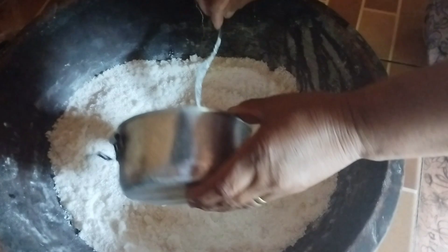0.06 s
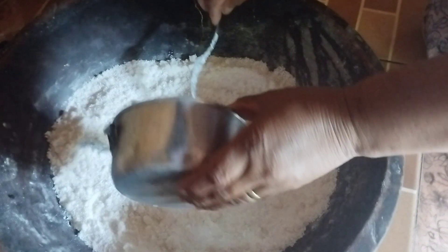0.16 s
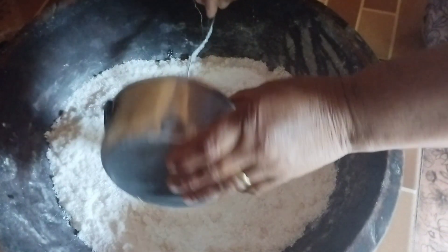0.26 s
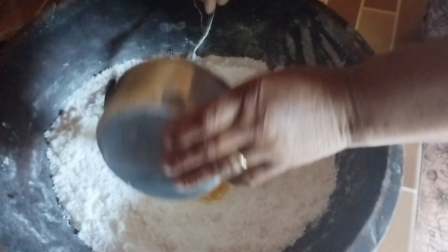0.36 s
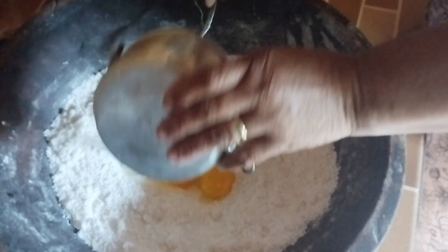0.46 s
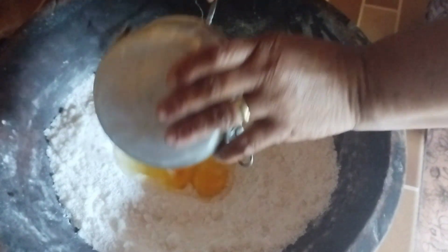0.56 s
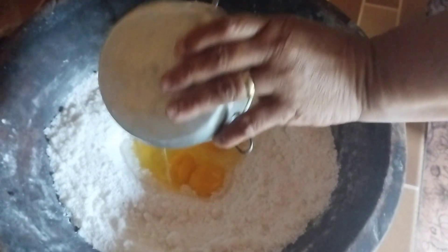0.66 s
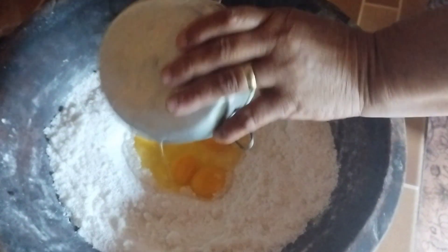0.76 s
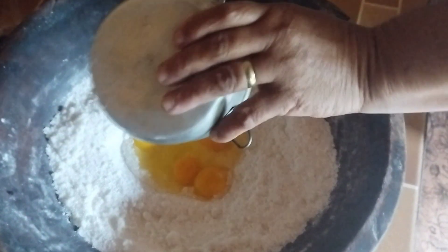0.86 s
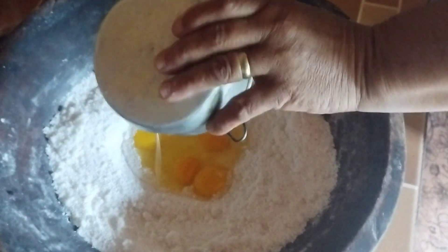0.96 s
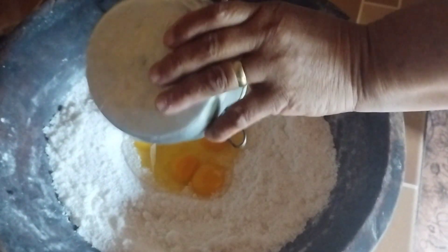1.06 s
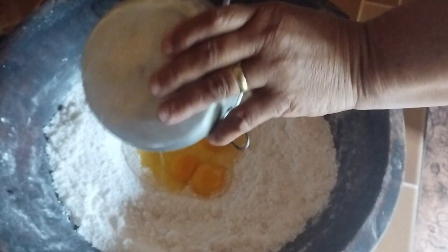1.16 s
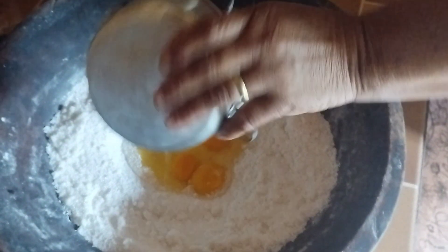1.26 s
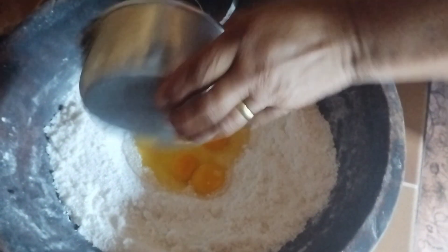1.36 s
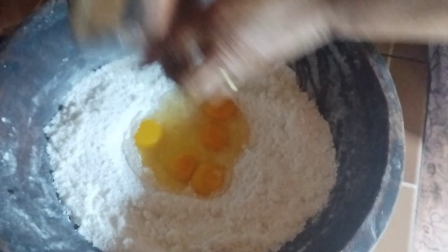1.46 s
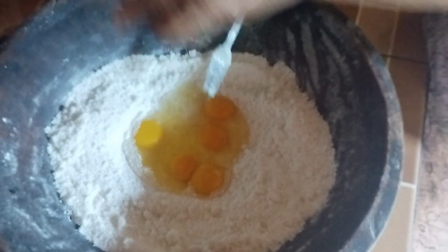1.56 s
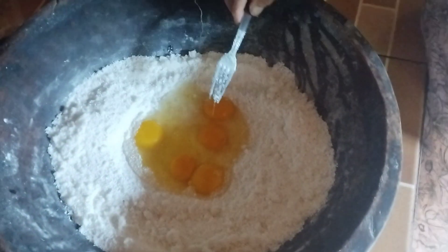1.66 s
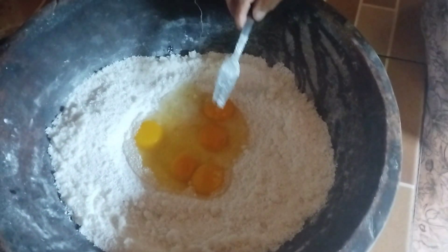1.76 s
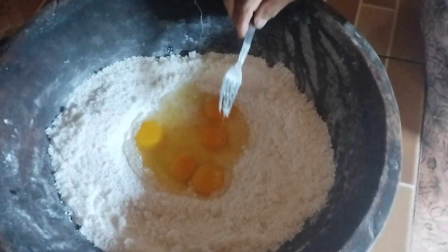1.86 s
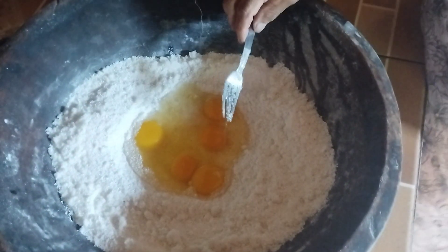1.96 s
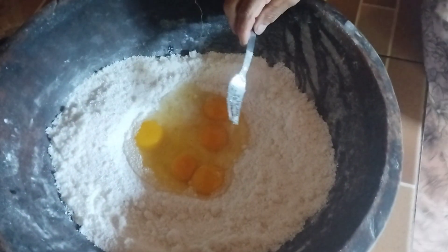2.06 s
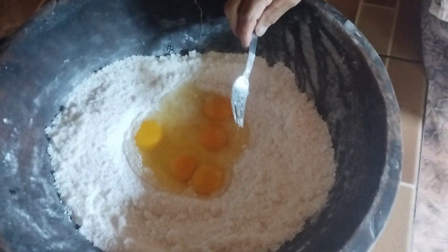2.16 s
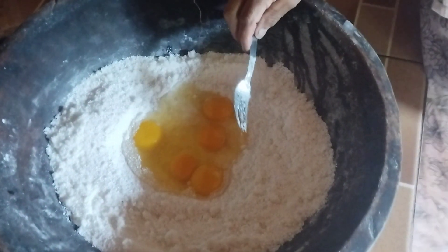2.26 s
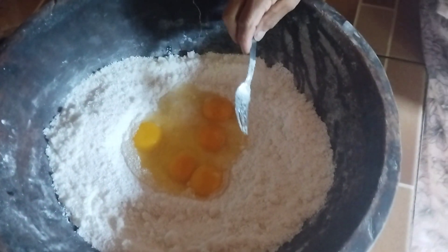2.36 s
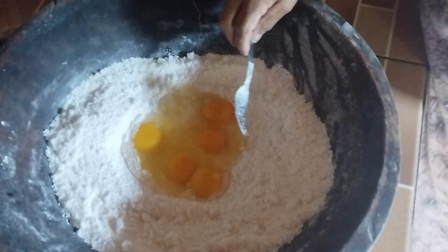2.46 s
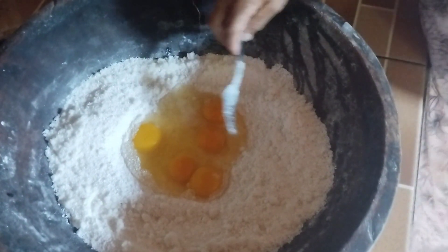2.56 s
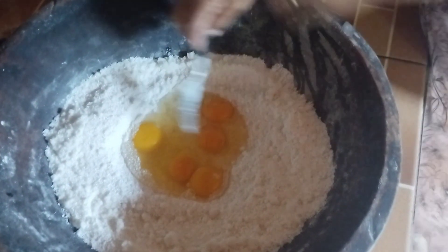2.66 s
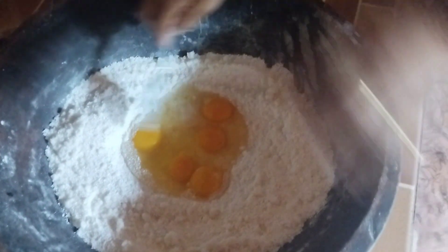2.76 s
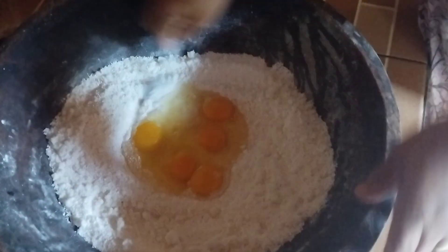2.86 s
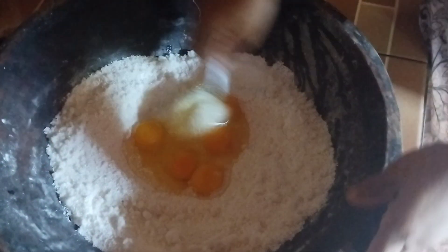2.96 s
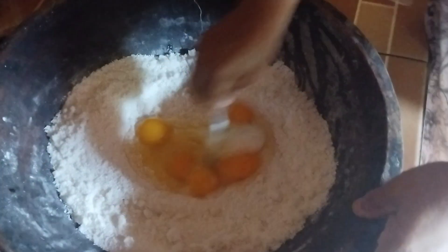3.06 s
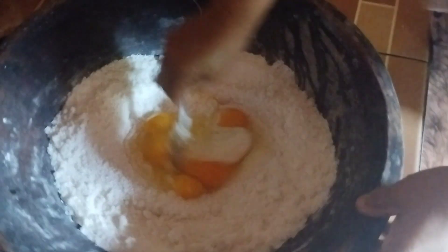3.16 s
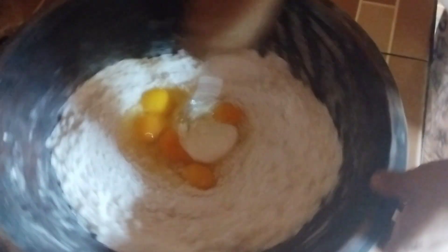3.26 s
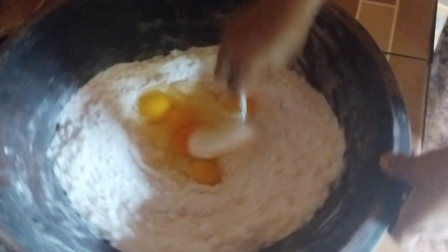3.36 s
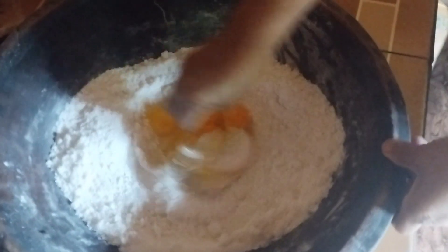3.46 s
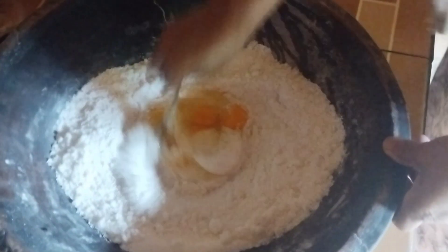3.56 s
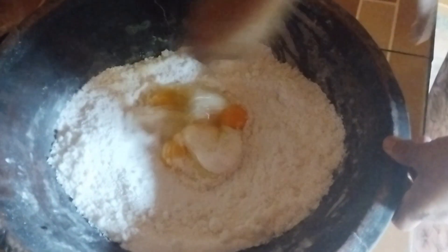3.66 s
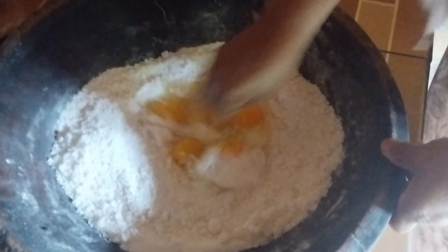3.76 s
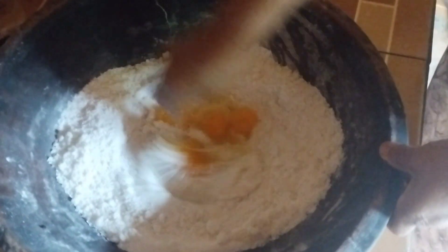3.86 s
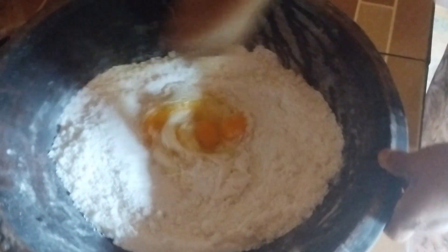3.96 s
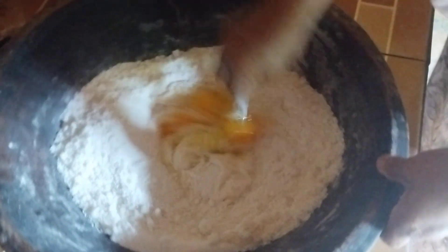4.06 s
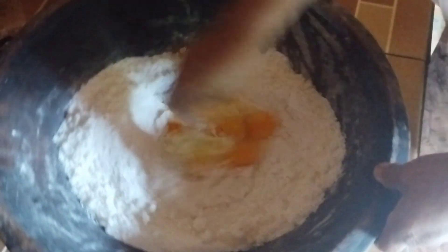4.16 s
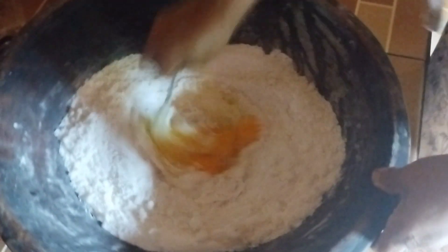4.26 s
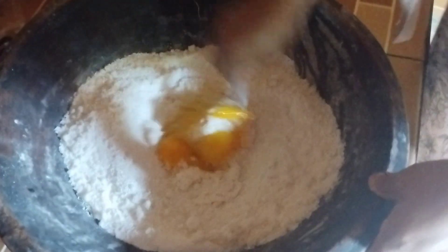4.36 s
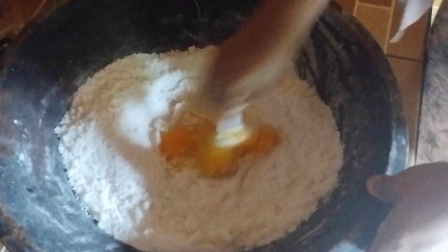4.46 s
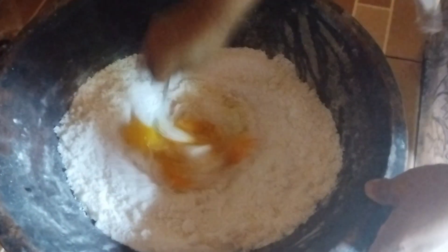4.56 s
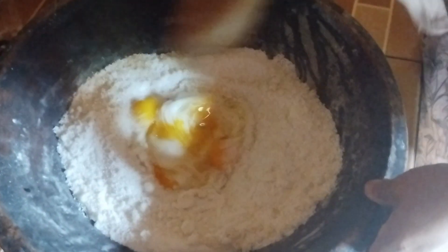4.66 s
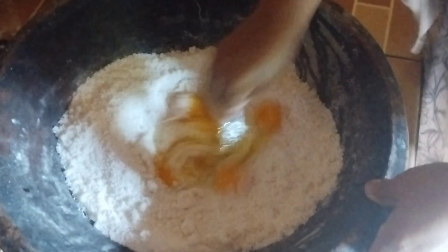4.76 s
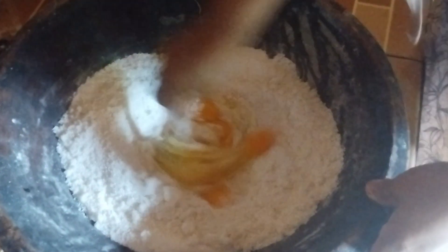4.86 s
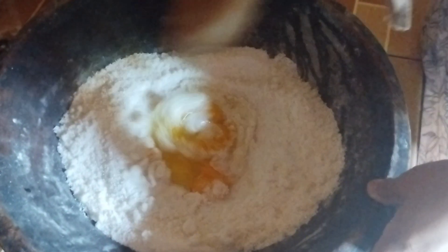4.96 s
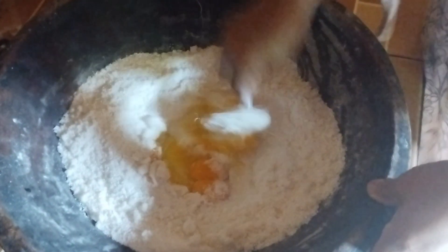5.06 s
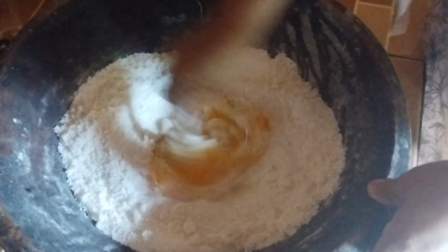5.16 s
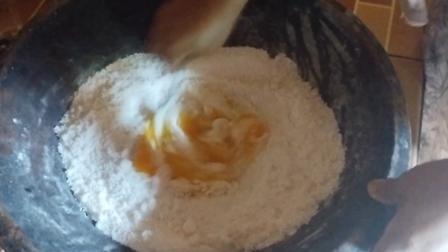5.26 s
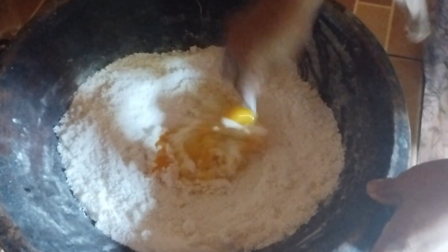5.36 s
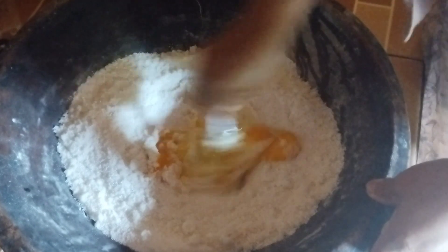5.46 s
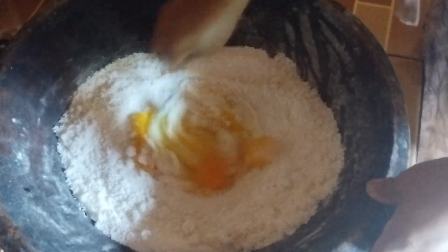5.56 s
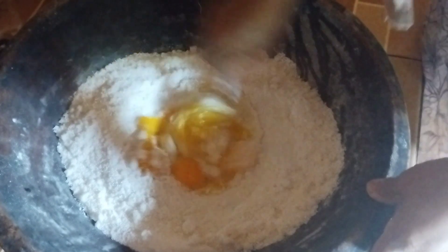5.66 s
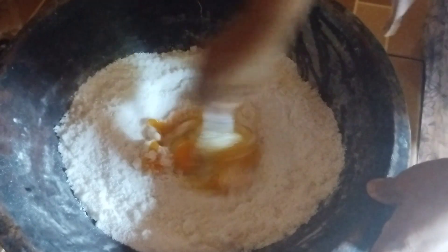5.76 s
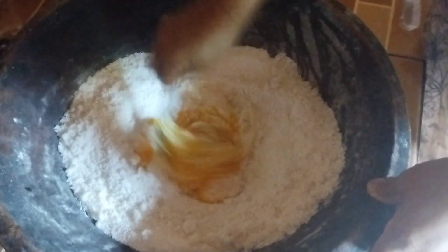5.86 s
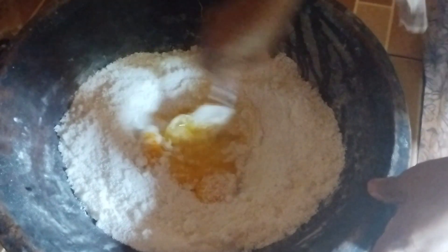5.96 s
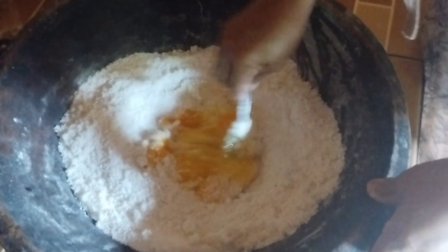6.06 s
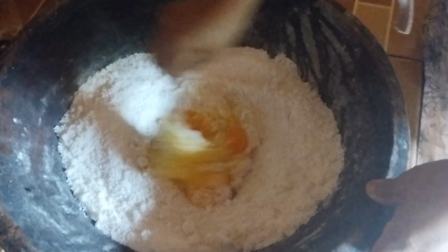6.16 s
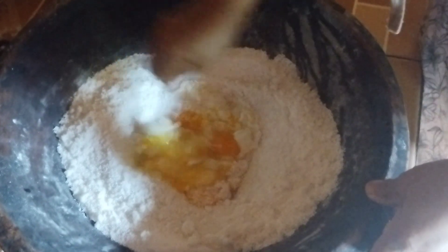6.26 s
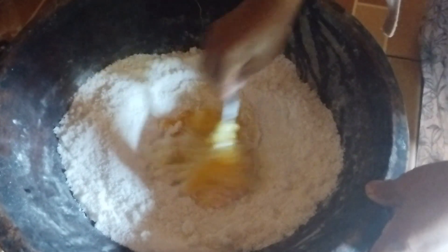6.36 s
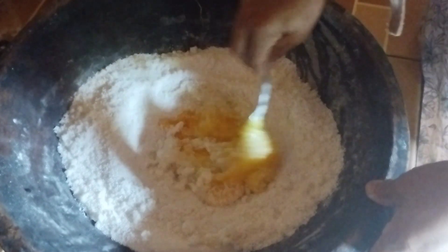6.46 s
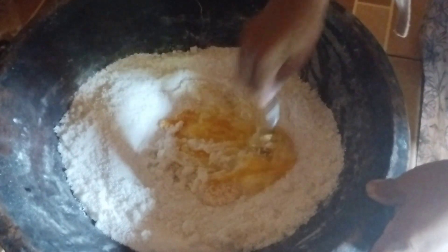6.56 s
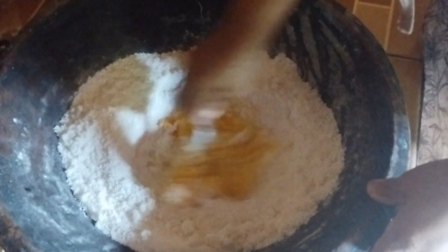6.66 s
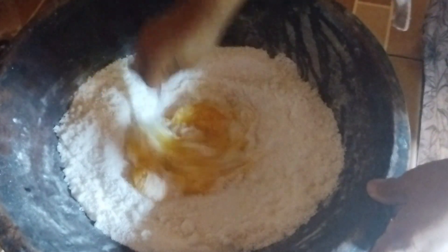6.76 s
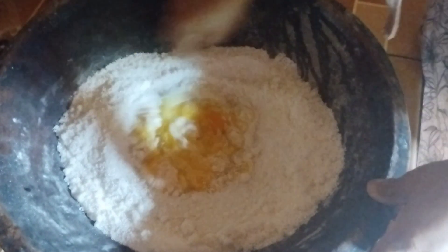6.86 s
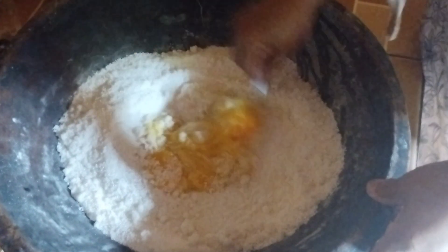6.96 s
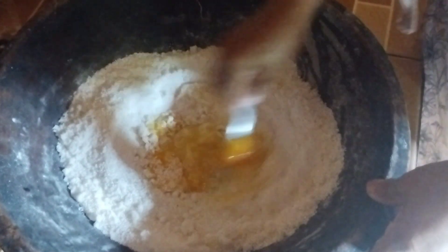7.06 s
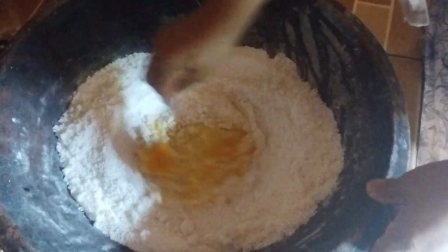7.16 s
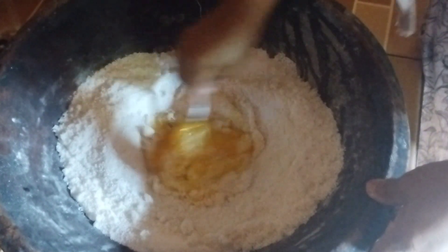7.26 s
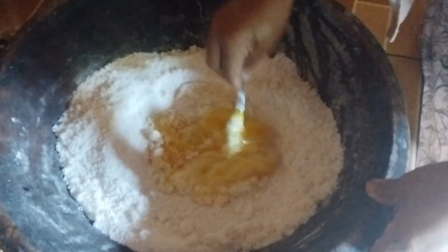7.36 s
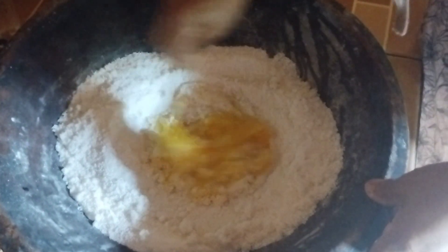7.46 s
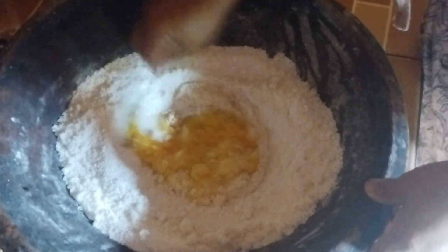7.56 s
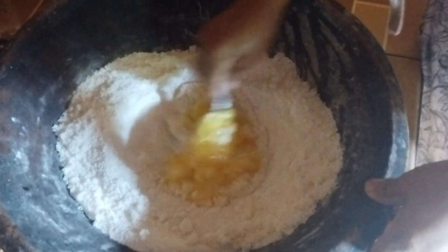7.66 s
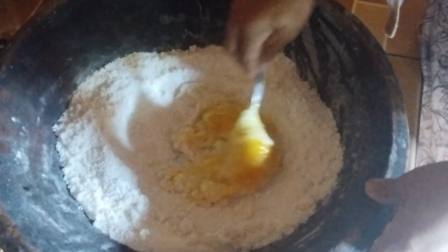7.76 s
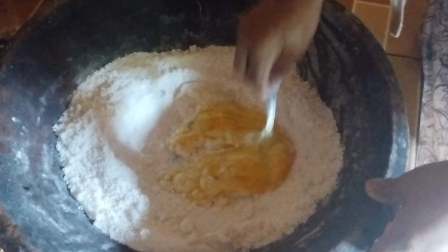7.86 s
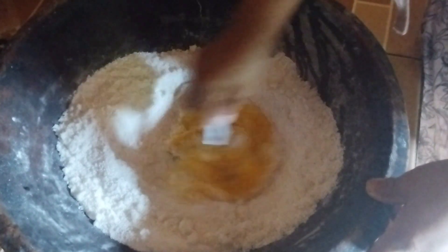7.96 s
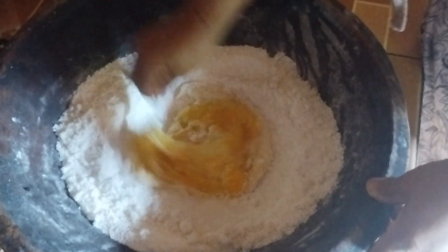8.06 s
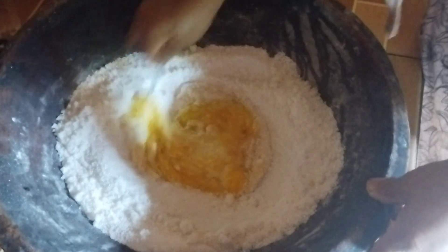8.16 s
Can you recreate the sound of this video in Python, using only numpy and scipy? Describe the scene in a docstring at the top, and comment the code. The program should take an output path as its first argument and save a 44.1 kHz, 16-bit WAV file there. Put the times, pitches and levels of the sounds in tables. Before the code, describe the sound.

A close stereo pickup in a small, reflective tiled kitchen, with faint hiss. From 0 to 1.5 s a hand-damped steel pot makes light ticks and dull hollow knocks; eggs land with a barely audible soft crunch near 0.4. Loose wire handles snap brightly and chatter near 1.0 and 1.4. Small ticks follow around 1.7, then at 2.24 the pot is set down with by far the loudest sound, a bright ringing clank, with further clanks at 2.4 and 2.48 as it rattles flat. The hiss drops nearly away, then returns around 2.9. From 3.0 a fork jabs and drags through gritty starch about three times a second, with dull basin bumps and a sharper jab at 5.1. From 5.7 to 8.2 the strokes become swelling, wetter raspy sweeps, strong at first and varying in force, over soft low thuds and booms.

```python
"""A fork beats eggs about three times a second, tines stick-slipping through starch along a softly booming basin.
First the eggs are tipped in from a small steel pot, heard as dull hollow knocks; its wire handles flop and clink.
The pot is set down on something hard, rings as a sum of dying modes and rocks flat in a run of tiny slips.
Touches are coloured noise bursts; a small tiled kitchen answers with dense reflections.
Background hiss is turned down by the recorder after the loud blow, then let back up."""
import sys
import numpy as np
from scipy import signal
from scipy.fft import rfft, irfft
from scipy.io import wavfile

SR = 44100
rng = np.random.default_rng(int(sys.argv[2]) if len(sys.argv) > 2 else 0)


def digitize_waveform(pressure):
    """Quantize a signal to 16-bit integers and store it at the path in sys.argv[1].

    Rows of a 2-D input are taken as channels; values are limited to [-1, 1].
    """
    field = np.atleast_2d(pressure).T
    bounded = np.clip(field, -1, 1)
    quanta = np.round(bounded * 32767).astype(np.int16)
    wavfile.write(sys.argv[1], SR, quanta)


N = 362061
T = np.arange(SR // 2) / SR  # time since a blow [s]


def amp(db):
    """Decibels to gain."""
    return 10 ** (np.asarray(db) / 20)


def evened(x):
    """Scales to rms 1."""
    return x / np.sqrt(np.mean(x ** 2) + 1e-20)


def read(points, hz):
    """Interpolates a table on a log-frequency axis."""
    table_hz, value = np.transpose(points)
    return np.interp(np.log(hz + 1), np.log(table_hz + 1), value)


def sides(left_right_db):
    """Left and right gains for a level difference, at constant power."""
    return evened(amp([[left_right_db / 2], [-left_right_db / 2]]))


def fade(t60_s):
    """Exponential decay after a blow."""
    return np.exp(-np.log(1000) * T / max(t60_s, 1e-3))


def add(mix, start_s, sound):
    """Mixes a sound in at a start time."""
    part = mix[:, max(round(start_s * SR), 0):][:, :sound.shape[1]]
    part += sound[:, :part.shape[1]]


# left-right likeness of noise: (frequency [Hz], correlation [0-1])
LIKENESS = [(130, .88), (700, .75), (1500, .05)]


def noise(colour, size=len(T), centre_hz=1, focus_db=0):
    """Coloured stereo noise, alike in the bass; focus_db is its fall an octave from centre_hz."""
    hz = np.fft.rfftfreq(size, 1 / SR)
    left, other = rfft(rng.standard_normal((2, size)))
    same = np.clip(read(LIKENESS, hz), -1, 1)
    right = same * left + np.sqrt(1 - same ** 2) * other
    octaves = np.log2((hz + 1) / centre_hz)
    fall_db = focus_db * 2 * octaves ** 2 / (1 + octaves ** 2)
    gain = amp(read(colour, hz) - fall_db)
    return evened(irfft(np.array([left, right]) * gain, size))


def ring(modes, length=1, side=((1, 0),), split=.025, twin_db=-6):
    """Dying modes of alternating sign; high ones have a faint twin and reach the two ears out of step."""
    out = np.zeros((2, len(T)))
    for k, (hz, db, t60_s) in enumerate(modes):
        high = hz > 1500
        lag, twin_lag = rng.uniform(-np.pi, np.pi, (2, 2, 1)) * high
        twin_hz = hz * (1 + split * rng.uniform(-1, 1))  # the metal is not quite round
        tone = np.sin(2 * np.pi * hz * T + lag)
        tone = tone + high * amp(twin_db) * np.sin(2 * np.pi * twin_hz * T + twin_lag)
        out += (-1) ** k * amp(db) * sides(read(side, hz)) * fade(t60_s * length) * tone
    return out / np.sqrt(sum(amp(mode[1]) ** 2 for mode in modes) / 2)


def slips(peak_s, rise_s, fall_s, grain, per_s, spread_db):
    """A swelling and fading run of tiny slips, each sounding the grain; gives (start [s], sound)."""
    rise_s, fall_s = max(rise_s, 1e-3), max(fall_s, 1e-3)
    t = T - 2 * rise_s
    size_db = spread_db * np.minimum(rng.exponential(1, len(T)), np.pi)
    size = amp(size_db) * rng.choice([-1, 1], len(T))
    clicks = evened(size * (rng.random(len(T)) < per_s / SR))
    force = 10 ** -np.minimum(np.maximum(-t / rise_s, t / fall_s) ** 1.15, 10)  # -20 dB at rise_s, fall_s
    grain = grain[:, :SR // 10] / np.linalg.norm(grain[0])
    return peak_s - 2 * rise_s, signal.fftconvolve((clicks * force)[None], grain, axes=1)


# eggs slide into the starch: (time [s], level [dB], 20 dB swell [s], 20 dB fade [s])
EGGS_LAND = (.424, -53, .012, .04)
# jabs through dry starch to the basin, then drags back:
# (time [s], jab level [dB], 20 dB jab fade [s], drag level [dB])
JABS = [(3.008, -47, .045, -62), (3.299, -50, .05, -41), (3.406, -42, .09, -50), (3.577, -44, .075, -56),
        (3.772, -41, .1, -48), (4.121, -44, .1, -46), (4.485, -46, .065, -48), (4.825, -49, .06, -54),
        (5.112, -33, .055, -58), (5.469, -41, .035, -54)]
# eggs broken, one swell a turn: (peak time [s], level [dB], 20 dB swell or fade [s], basin boom [dB])
SWEEPS = [(5.746, -31, .04, -72), (6.066, -35, .04, -52), (6.405, -51, .042, -75), (6.748, -45, .06, -70),
          (7.003, -36, .046, -53), (7.358, -44, .042, -57), (7.723, -35, .032, -50),
          (8.104, -37, .055, -68)]
STRIKE_REL_JAB_DB, STRIKE_FALL_S = -4, .012  # tines' first contact with the basin
JAB_RISE_S = .014
DRAG_LAG_S, DRAG_RISE_S, DRAG_FALL_S, DRAG_PITCH_RATIO = .138, .075, .05, .86
BITE_LEAD_S, BITE_REL_SWEEP_DB, BITE_FALL_S = .042, -9, .05  # tines bite before each sweep peaks


def pushes():
    """Eggs land, then strike-jab-drag or bite-sweep turns: (peak s, dB, swell s, fade s, pitch ratio)."""
    yield *EGGS_LAND, 1
    for s, db, fall_s, drag_db in JABS:
        yield s, db + STRIKE_REL_JAB_DB, STRIKE_FALL_S / 2, STRIKE_FALL_S, 1
        yield s, db, JAB_RISE_S, fall_s, 1
        yield s + DRAG_LAG_S, drag_db, DRAG_RISE_S, DRAG_FALL_S, DRAG_PITCH_RATIO
    for s, db, swell_s, _ in SWEEPS:
        yield s - BITE_LEAD_S, db + BITE_REL_SWEEP_DB, JAB_RISE_S, BITE_FALL_S, 1
        yield s, db, swell_s, swell_s, 1


# centre and narrowness of the rasp over time:
# (time [s], centre at a PUSH_REF_DB push [Hz], fall an octave off centre [dB])
RASP_FOCUS = [(3.2, 2400, 7), (4.3, 1650, 6), (5.2, 2450, 7), (6.1, 2250, 7), (7.35, 1900, 7),
              (7.7, 1600, 6), (8.1, 1280, 13)]
# colour of the rasp: (frequency [Hz], level [dB])
RASP_COLOUR = [(40, -28), (140, -4), (400, -1), (560, -9), (780, 6), (1150, -3), (1600, 1), (2300, 2),
               (3300, -3), (5000, -9), (16000, -36)]
# colour of crunching starch: (frequency [Hz], level [dB])
CRUNCH_COLOUR = [(1500, -20), (4000, -3), (10000, 0), (16000, -14)]
PUSH_REF_DB, OCTAVES_PER_DB = -42, .014  # a harder push rasps higher


def fork(rasp_db=-.7, crunch_db=-26, crunch_growth=.64, lump_db=-3):
    """Tines stick-slip on the gritty wall and crack lumps; the starch crunches, growing less with force."""
    out = np.zeros((2, N))
    times_s, centres_hz, focuses_db = np.transpose(RASP_FOCUS)
    for s, db, rise_s, fall_s, pitch in pushes():
        hz = pitch * np.interp(s, times_s, centres_hz) * 2 ** (OCTAVES_PER_DB * (db - PUSH_REF_DB))
        focus_db = np.interp(s, times_s, focuses_db)
        crunch_gain = amp(crunch_growth * db + crunch_db)
        rasp_grain = noise(RASP_COLOUR, centre_hz=hz, focus_db=focus_db) * fade(.013)
        start_s, rasp = slips(s, rise_s, fall_s, rasp_grain, per_s=1500, spread_db=4)
        add(out, start_s, amp(db + rasp_db) * sides(-2.5) * rasp)
        # sparse wet lumps, each a small tick
        lump_grain = noise(CLATTER_COLOUR) * fade(.005)
        start_s, lumps = slips(s, rise_s, 2 * fall_s, lump_grain, per_s=110, spread_db=2.5)
        add(out, start_s, crunch_gain * amp(lump_db) * lumps)
        crunch_grain = noise(CRUNCH_COLOUR) * fade(.005)
        start_s, crunch = slips(s, rise_s, fall_s, crunch_grain, per_s=1600, spread_db=4)
        add(out, start_s, crunch_gain * crunch)
    return out


# basin bumps on its seat: (time [s], level [dB], thud centre [Hz])
BUMPS = [(3.667, -49, 170), (3.688, -48, 90), (3.756, -55, 110), (5.78, -49, 400), (6.217, -53, 300),
         (6.495, -57, 140), (7.41, -58, 140)]
# basin modes: (frequency [Hz], level [dB], t60 [s])
BASIN_MODES = [(137, 0, .3), (268, -10, .15)]
# colour of a thud: (frequency [Hz], level [dB])
THUD_COLOUR = [(30, -24), (100, 0), (450, 0), (3000, -65)]
THUD_REL_PUSH_DB, THUD_HZ, BOOM_HZ = -16, 340, 185


def basin(thud_t60_s=.11, boom_db=-3, attack_s=.004):
    """Pushes and bumps jog the basin: a dull thud, and a boom of its modes that low pushes feed best."""
    out = np.zeros((2, N))
    thuds = [(s, db + THUD_REL_PUSH_DB, THUD_HZ) for s, db, _, _ in list(JABS) + list(SWEEPS)]
    booms = [(s - lead_s, db, BOOM_HZ) for s, _, _, db in SWEEPS for lead_s in (BITE_LEAD_S, 0)]
    for s, db, hz in list(BUMPS) + thuds + booms:
        thud = noise(THUD_COLOUR, centre_hz=hz, focus_db=12) * fade(thud_t60_s)
        boom = amp(boom_db) * min(BASIN_MODES[0][0] / hz, 1) * ring(BASIN_MODES)
        add(out, s, amp(db) * (thud + boom) * (1 - np.exp(-T / attack_s)))
    return out


# pot meets a hard thing: (time [s], ring level [dB], clatter level [dB],
# ring time as share of the free pot's [ratio], jolted handles' clink level [dB])
POT_BLOWS = [(1.4405, -47, -54, .9, -20), (1.656, -60, -60, .3, -55), (2.2402, -13.5, -22, .8, -24),
             (2.4035, -25, -20, .4, -30), (2.4755, -32, -29, .45, -24)]
# steel pot modes, lowest a beating pair: (frequency [Hz], level [dB], free t60 [s])
POT_MODES = [(699, 0, .33), (712, -3, .33), (1228, -17, .3), (1886, -8, .36), (1993, -8, .4),
             (2124, -3, .15), (2209, -2, .34), (2736, -12, .42), (2809, -14, .45), (3160, -16, .3),
             (3319, -7, .3), (4325, -10, .2), (5836, -13, .22), (6364, -14, .2), (9227, -6, .06)]
# where the modes radiate: (frequency [Hz], left-right difference [dB])
POT_SIDE = [(700, 8), (2200, -3), (4400, 5)]
# colour of clatter: (frequency [Hz], level [dB])
CLATTER_COLOUR = [(40, -28), (130, -19), (480, -11), (700, 0), (1150, 1), (1600, -7), (2100, 0),
                  (4400, -10), (16000, -32)]
# dull knocks while the hand damps the pot: (time [s], level [dB])
KNOCKS = [(.1293, -47), (.2585, -46), (.8102, -52), (.9465, -48), (1.1215, -40), (1.176, -49),
          (1.2747, -49), (1.3382, -38)]
# colour of a knock: (frequency [Hz], level [dB])
KNOCK_COLOUR = [(60, -24), (350, -6), (1000, 0), (2100, -5), (3500, -15), (16000, -32)]
# modes of the pot's hollow before retuning: (frequency [Hz], level [dB], t60 [s])
HOLLOW_MODES = [(926, 0, .13), (1050, -5, .08)]
FLOP_KNOCK_DB = -38


def pot(clatter_t60_s=.14, knock_t60_s=.04, hollow_db=-10, grip_spread=.025):
    """Set-down blows ring the steel modes and clatter; in the hand only knocks and the hollow sound."""
    out = np.zeros((2, N))
    for s, ring_db, clatter_db, length, _ in POT_BLOWS:
        steel = amp(ring_db) * ring(POT_MODES, length, POT_SIDE)
        clatter = amp(clatter_db) * noise(CLATTER_COLOUR) * fade(clatter_t60_s)
        add(out, s, steel + clatter)
    flop_knocks = [(flop[0] + REBOUND_LAG_S / 2, FLOP_KNOCK_DB) for flop in FLOPS]
    for s, db in list(KNOCKS) + flop_knocks:
        shift = 1 + grip_spread * rng.standard_normal()  # grip and tilt retune the hollow
        hollow = ring([(hz * shift, level_db, t60_s) for hz, level_db, t60_s in HOLLOW_MODES])
        knock = noise(KNOCK_COLOUR) * fade(knock_t60_s)
        add(out, s, amp(db) * (knock + amp(hollow_db) * hollow))
    return out


def rolling(peak_s=2.37, db=-31, rise_s=.1, fall_s=.11, ring_db=2):
    """After its loudest ring the pot grinds on the edge of its base in tiny slips until it lies flat."""
    out = np.zeros((2, N))
    grain = noise(CLATTER_COLOUR) * fade(.05) + amp(ring_db) * ring(POT_MODES, .3, POT_SIDE)
    add(out, *slips(peak_s, rise_s, fall_s, grain, per_s=500, spread_db=2))
    touch_s = max(POT_BLOWS, key=lambda blow: blow[1])[0]
    touching = np.arange(N) / SR > touch_s
    return amp(db) * out * touching


# handle flops on the pot, rebounds, chatters:
# (time [s], strike level [dB], rebound level [dB], chatter level [dB], 20 dB chatter fade [s])
FLOPS = [(.9883, -18, -14, -37, .19), (1.3703, -15, -21, -46, .1), (2.4035, -22, -16, -33, .07)]
# single light handle touches: (time [s], level [dB])
TOUCHES = [(.2595, -42), (1.102, -33), (1.3385, -37), (2.311, -35), (2.335, -29)]
# wire handle modes: (frequency [Hz], level [dB], t60 [s])
HANDLE_MODES = [(2110, -10, .2), (5847, -6, .2), (6151, -2, .22), (6195, -1, .26), (7250, 0, .2),
                (7530, -1, .22), (9260, -3, .18), (10010, -3, .14)]
# colour of a clink: (frequency [Hz], level [dB])
CLINK_COLOUR = [(100, -38), (1400, -17), (2200, -5), (3300, -12), (5000, -8), (6200, 0), (11000, -3),
                (16000, -18)]
REBOUND_LAG_S, CHATTER_LAG_S, CHATTER_RISE_S = .006, .105, .07
BUZZ_REL_RING_DB, BUZZ_RISE_S, BUZZ_FALL_S = -17, .012, .08  # handles buzz on the ringing pot


def handles(crack_t60_s=.036, ring_db=-15):
    """Loose wire handles snap against the pot, ring, and chatter to rest."""
    out = np.zeros((2, N))
    clinks, chatters = list(TOUCHES), []
    for s, db, rebound_db, chatter_db, fall_s in FLOPS:
        clinks += [(s, db), (s + REBOUND_LAG_S, rebound_db)]
        chatters.append((s + CHATTER_LAG_S, chatter_db, CHATTER_RISE_S, fall_s))
    for s, pot_db, _, _, clink_db in POT_BLOWS:
        clinks.append((s, clink_db))
        chatters.append((s + 2 * BUZZ_RISE_S, pot_db + BUZZ_REL_RING_DB, BUZZ_RISE_S, BUZZ_FALL_S))
    for s, db in clinks:
        crack = noise(CLINK_COLOUR) * fade(crack_t60_s)
        add(out, s, amp(db) * (crack + amp(ring_db) * ring(HANDLE_MODES)))
    for s, db, rise_s, fall_s in chatters:
        grain = noise(CLINK_COLOUR) * fade(.06)
        start_s, rattle = slips(s, rise_s, fall_s, grain, per_s=900, spread_db=3)
        add(out, start_s, amp(db) * rattle)
    return out


# short dry ticks of steel: (time [s], level [dB])
TICKS = [(.0522, -44), (.2582, -34), (.5508, -34), (1.6555, -42), (1.795, -41), (3.5773, -40),
         (4.7868, -45), (5.0238, -39), (6.2215, -52), (6.2976, -50)]
# colour of a tick: (frequency [Hz], level [dB])
TICK_COLOUR = [(150, -14), (700, -6), (9000, 0), (16000, -9)]


def ticks(t60_s=.018):
    """Light touches of steel, too damped to ring: short noise bursts."""
    out = np.zeros((2, N))
    for s, db in TICKS:
        add(out, s, amp(db) * noise(TICK_COLOUR) * fade(t60_s))
    return out * sides(-3)


# room decay: (frequency [Hz], t60 [s])
ROOM_T60 = [(100, .4), (2000, .37), (7000, .32), (15000, .24)]


def kitchen(sent, build_s=.008):
    """Dense reflections from tiles: a noise tail, each band dying at its own speed."""
    hz, t, bands = signal.stft(noise([(1, 0)]), SR)
    decay = np.exp(-np.log(1000) * t / read(ROOM_T60, hz)[:, None])
    tail = signal.istft(bands * decay, SR)[1][:, :len(T)]
    tail *= 1 - np.exp(-(T / build_s) ** 2)
    return signal.fftconvolve(sent, tail / np.linalg.norm(tail[0]), axes=1)[:, :N]


# colour of the hiss: (frequency [Hz], level [dB])
HISS_COLOUR = [(25, -16), (70, -3), (120, 2), (300, 1), (1000, -5), (1500, -3), (2000, 2), (3200, -4),
               (10000, -6), (16000, -12)]
# hiss as the recorder turns it down and lets it back up: (time [s], level [dB])
HISS_LEVEL = [(0, -62), (.9, -68), (2.2, -68), (2.6, -77), (2.88, -79), (2.94, -67), (5.3, -65), (6.5, -76),
              (8.21, -72)]


def hiss():
    """Background hiss: coloured noise turned down by the recorder after the loud blow, then let back up."""
    level_db = np.interp(np.arange(N) / SR, *np.transpose(HISS_LEVEL))
    return noise(HISS_COLOUR, size=N) * amp(level_db)


def scene():
    """Sums the sources, each with its own share of the room."""
    scrape, boom = fork(), basin()
    steel, clinks, light = pot() + rolling(), handles(), ticks()
    sent = amp(-8) * scrape + amp(-11) * (boom + steel + light) + amp(-5.5) * clinks
    return scrape + boom + steel + clinks + light + kitchen(sent) + hiss()


def record(dry, low_cut_hz=70, edge_hz=16100):
    """A high-pass keeps the mix free of deep bass; then a linear-phase low-pass limits the band."""
    high_pass = signal.butter(2, low_cut_hz, "highpass", fs=SR, output="sos")
    thin = signal.sosfilt(high_pass, dry)
    low_pass = signal.firwin(511, edge_hz, window=("kaiser", 9), fs=SR)
    return signal.oaconvolve(thin, low_pass[None], "same")


dry = scene()
out = record(dry)
digitize_waveform(out)
```